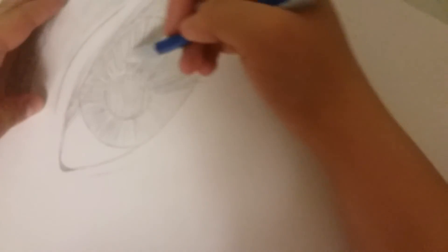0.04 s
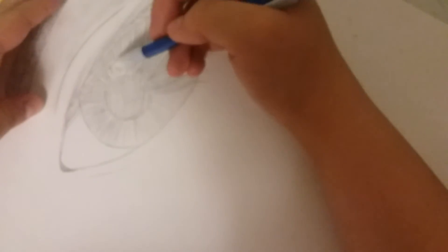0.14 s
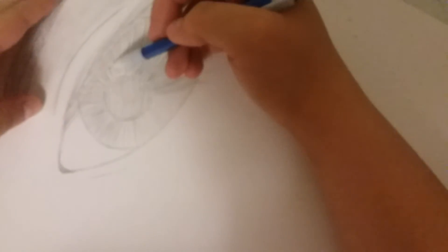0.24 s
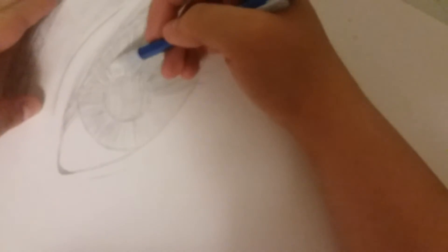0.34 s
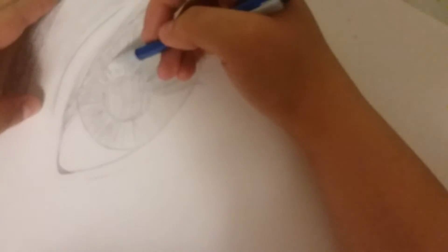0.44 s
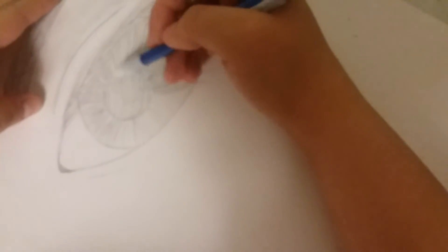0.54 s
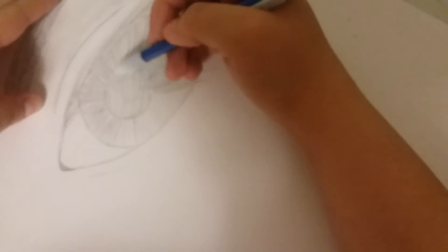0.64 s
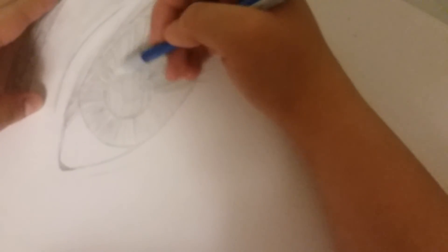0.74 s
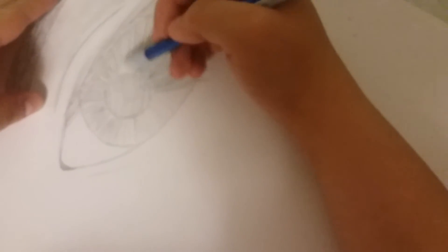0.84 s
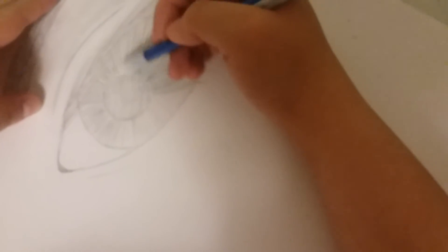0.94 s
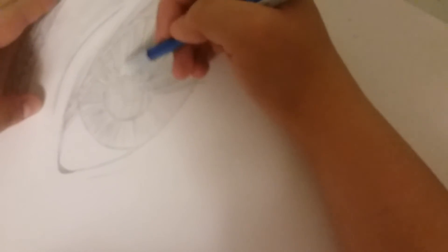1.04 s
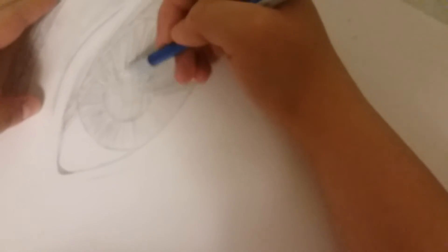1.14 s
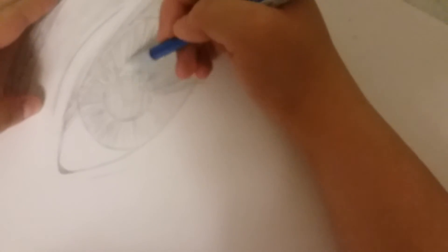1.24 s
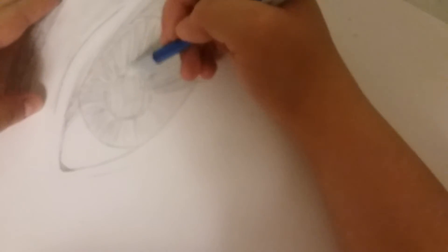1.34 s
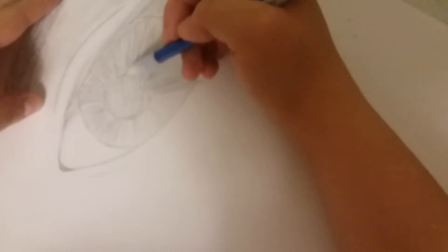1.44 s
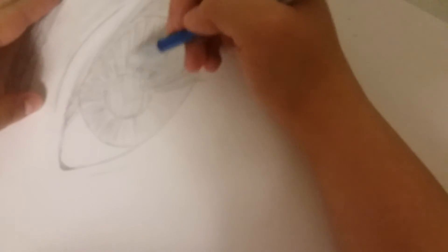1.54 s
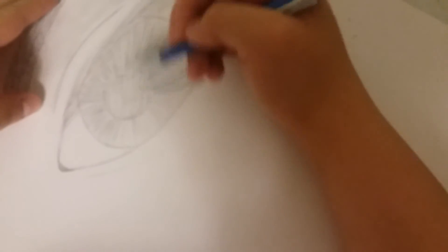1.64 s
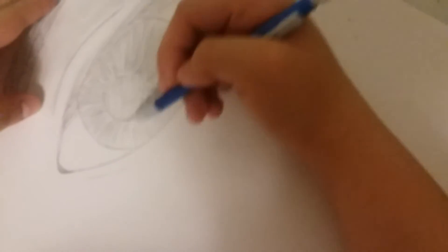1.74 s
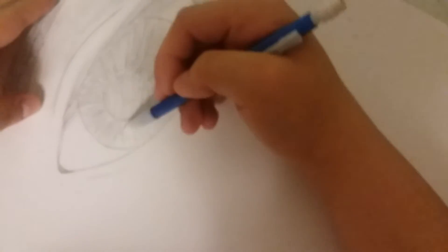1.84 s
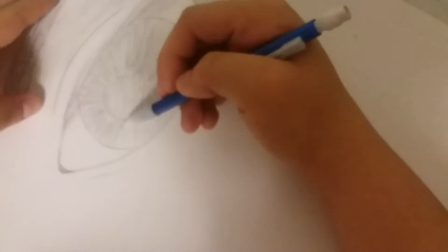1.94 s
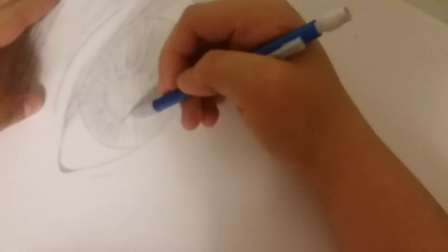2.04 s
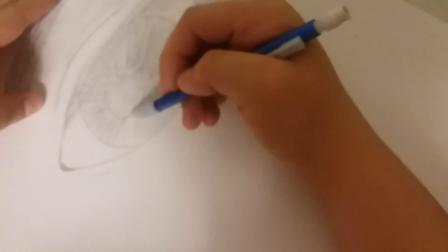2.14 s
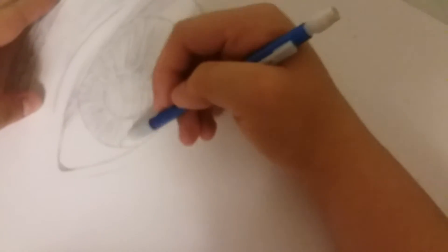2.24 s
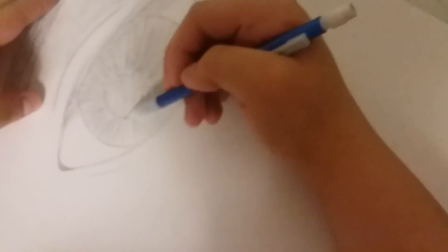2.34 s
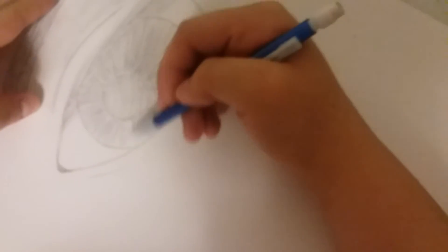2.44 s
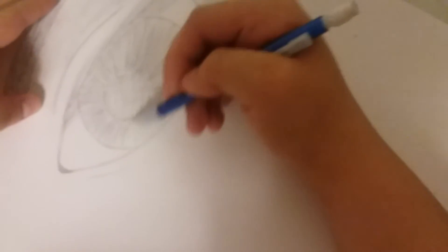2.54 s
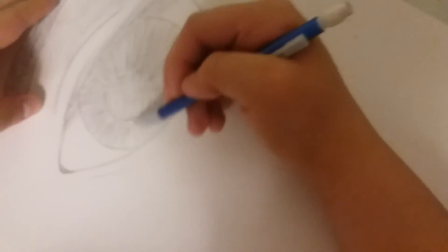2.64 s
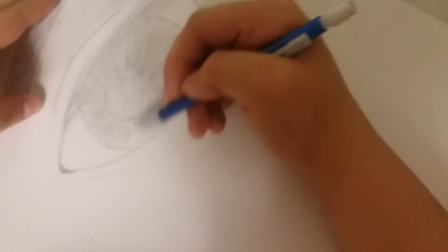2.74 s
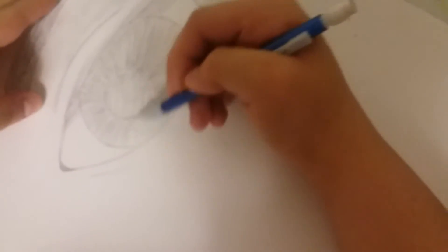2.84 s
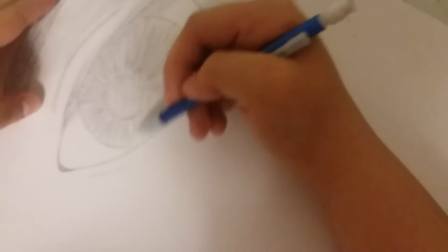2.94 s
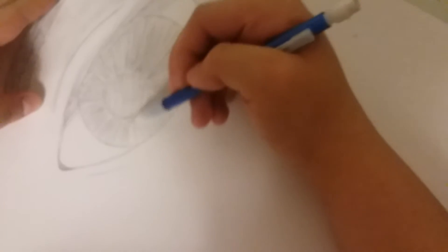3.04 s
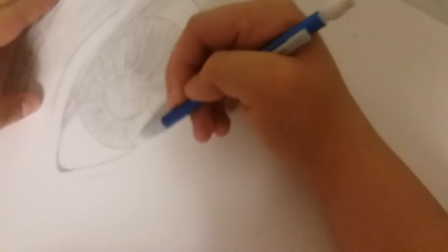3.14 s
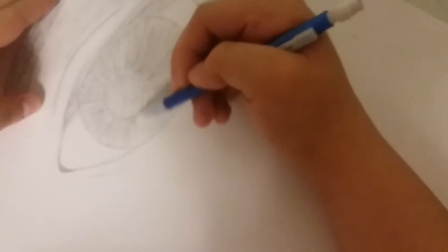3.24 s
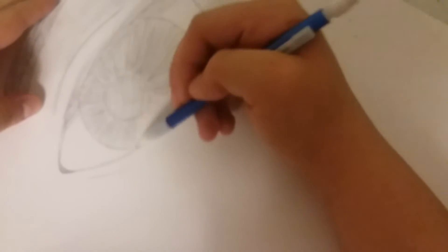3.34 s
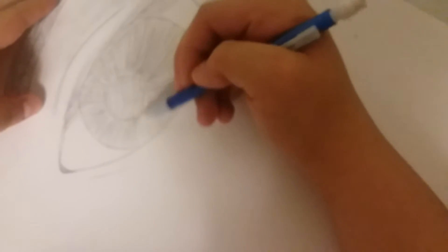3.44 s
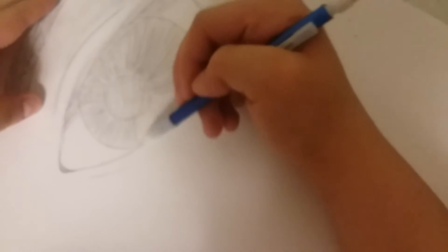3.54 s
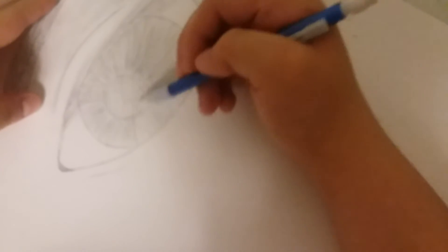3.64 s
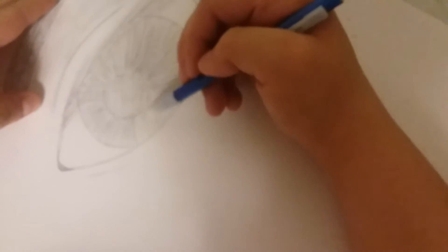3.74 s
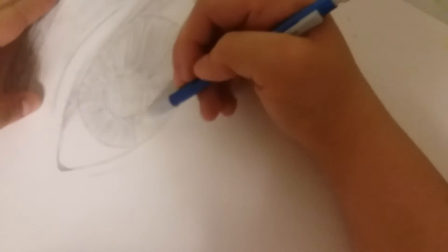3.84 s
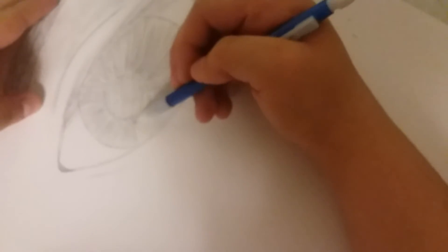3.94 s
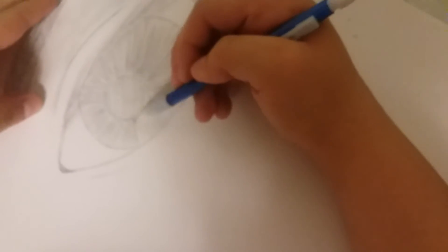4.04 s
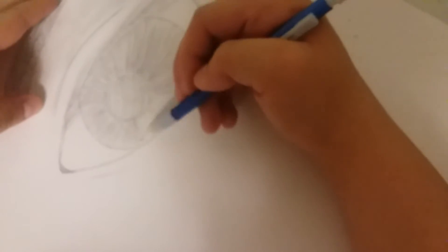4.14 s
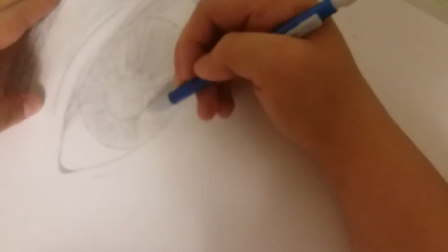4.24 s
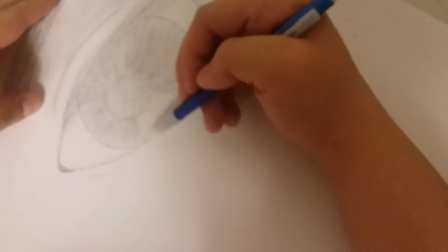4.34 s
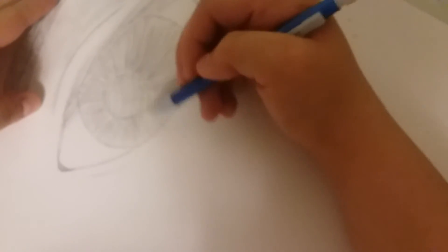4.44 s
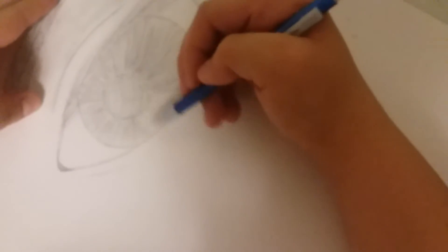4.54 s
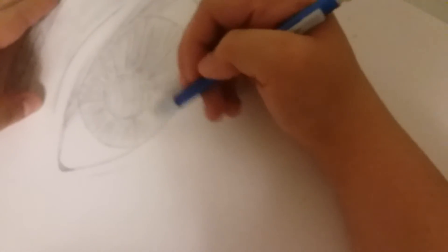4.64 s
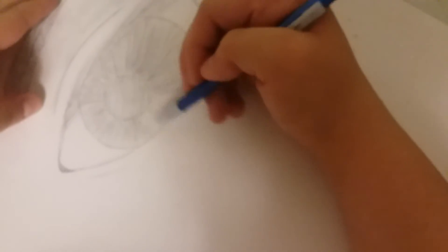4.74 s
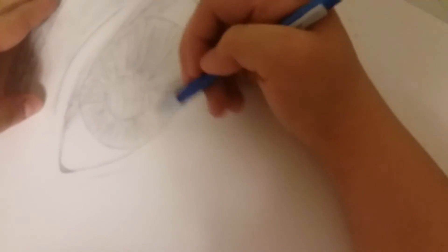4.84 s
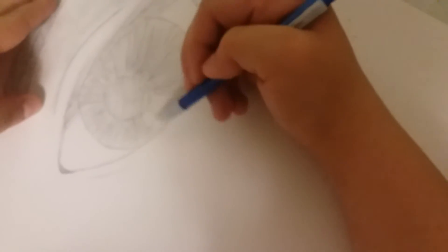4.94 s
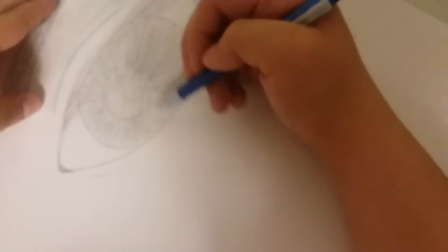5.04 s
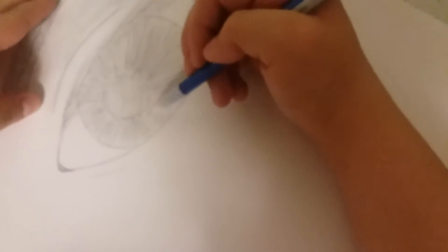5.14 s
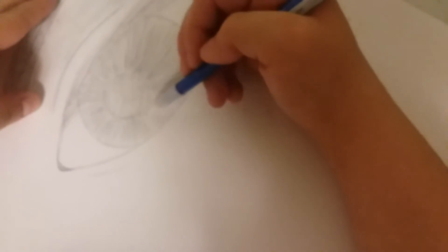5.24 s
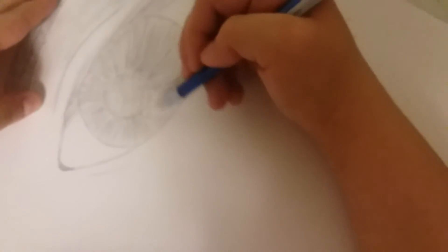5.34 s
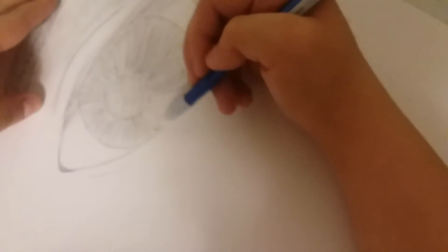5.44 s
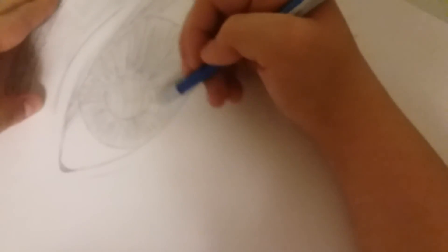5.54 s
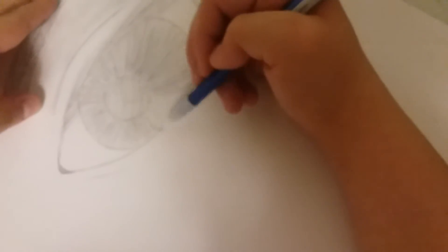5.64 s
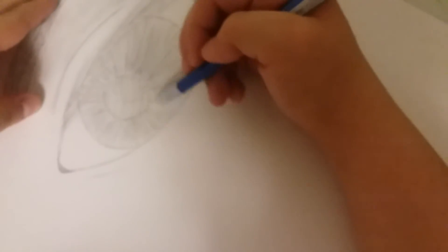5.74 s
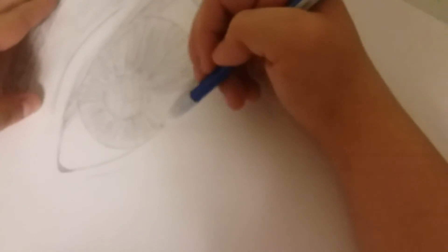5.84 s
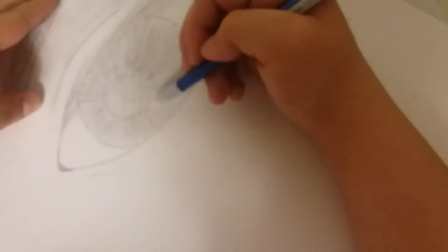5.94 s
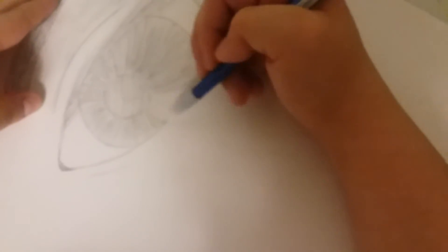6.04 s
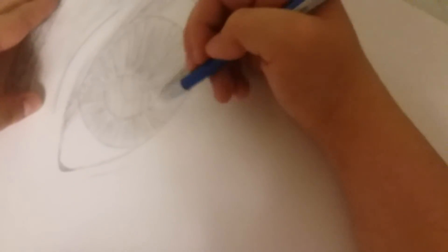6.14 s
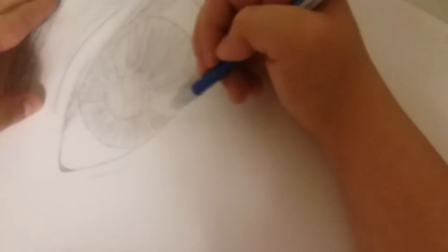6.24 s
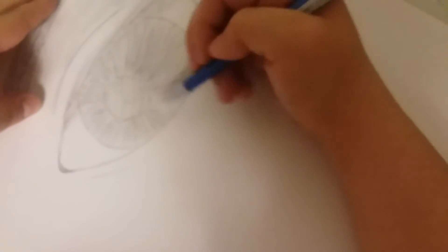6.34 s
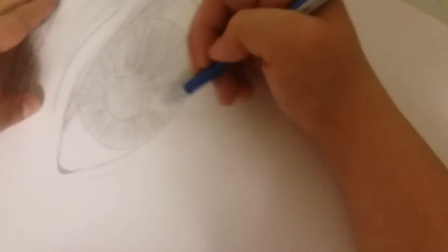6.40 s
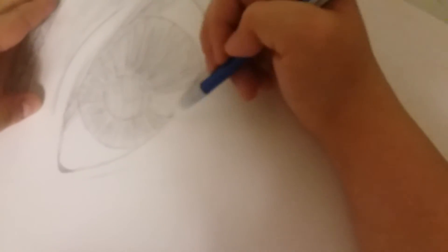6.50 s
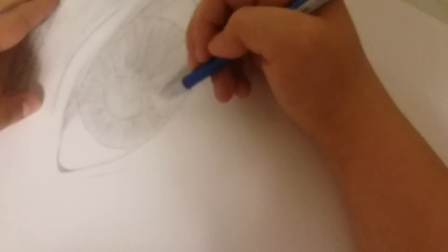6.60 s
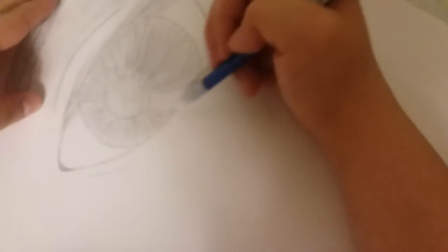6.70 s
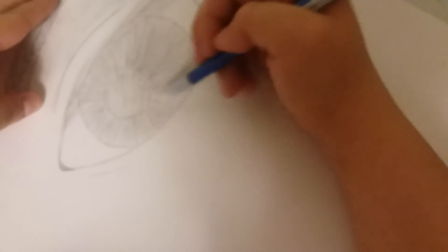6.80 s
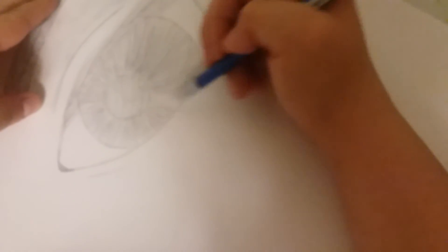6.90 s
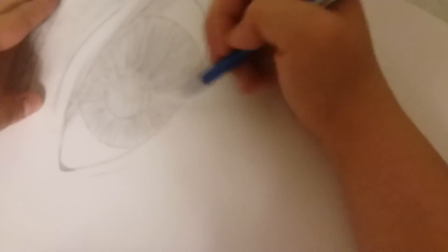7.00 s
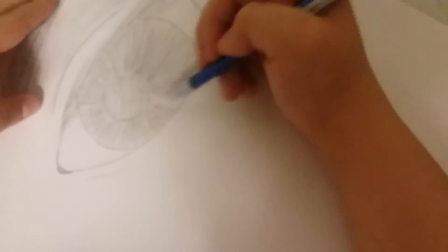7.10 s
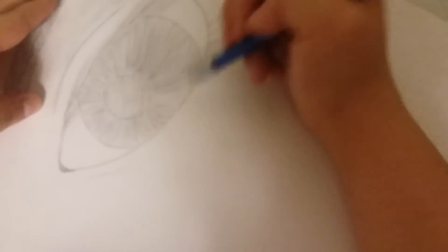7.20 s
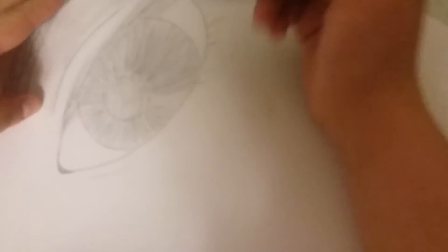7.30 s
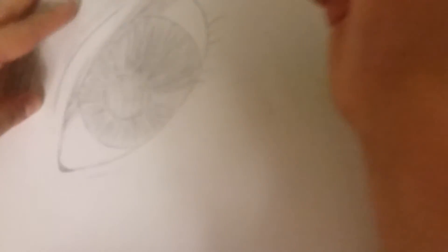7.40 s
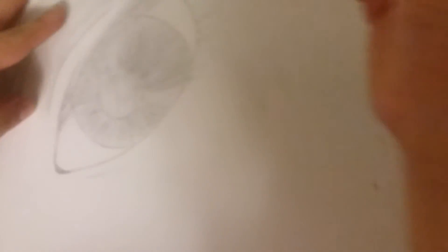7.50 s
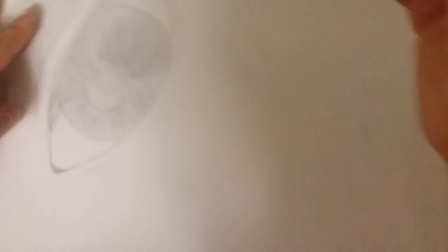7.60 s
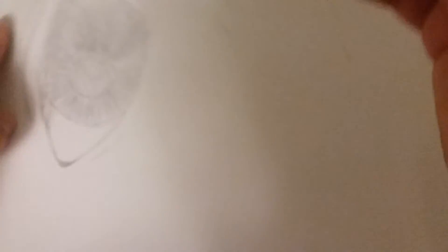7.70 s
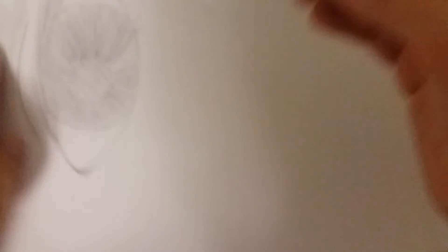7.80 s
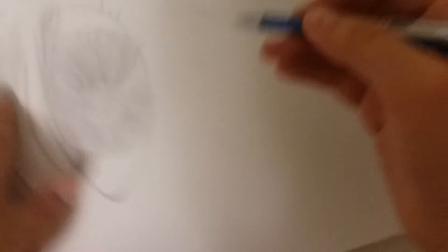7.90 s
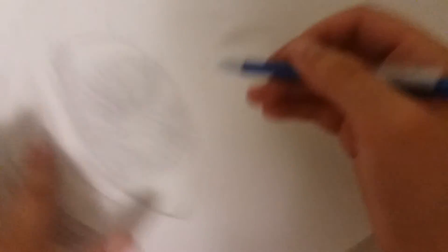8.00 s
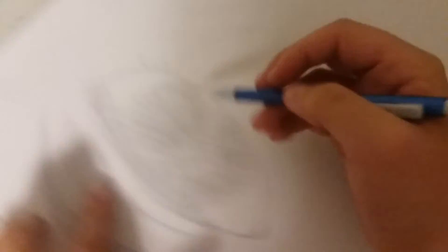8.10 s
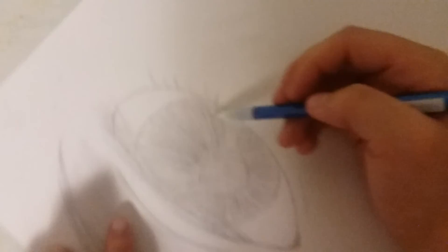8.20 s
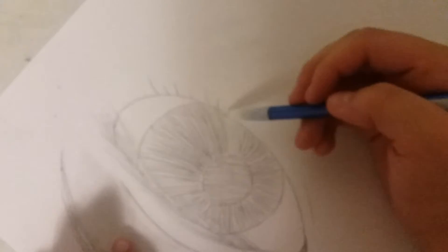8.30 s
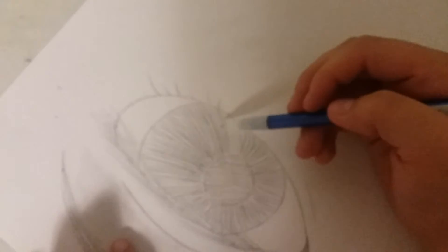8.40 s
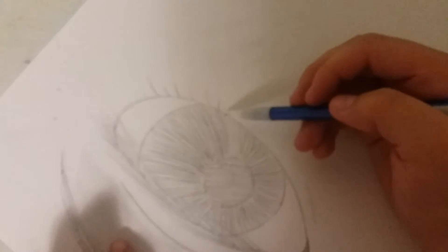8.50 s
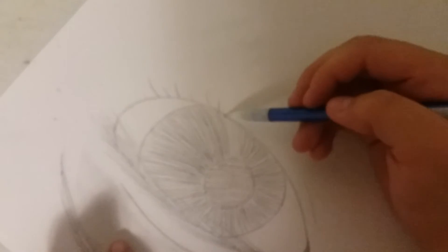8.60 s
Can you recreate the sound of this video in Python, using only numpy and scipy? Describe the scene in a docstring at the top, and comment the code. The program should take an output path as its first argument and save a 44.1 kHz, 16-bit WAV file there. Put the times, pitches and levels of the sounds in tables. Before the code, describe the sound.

A mechanical pencil shades on paper at a table, heard close up in a quiet room. After a soft brush of the hand and a small plastic click, quick short strokes scratch and hiss, with light taps as the lead lands. The shading pauses briefly, once for a dull bump and another click. Near the end a hand thumps down loudly and slides the sheet round, its edge scraping and snapping crisply.

```python
"""A table in a quiet room, where a mechanical pencil shades a drawing in quick, short strokes.
The lead lands with a tap and rides over the paper's tooth, which hisses and makes the table top murmur.
The hand brushes the sheet, and the pencil's plastic parts click as the grip shifts.
Near the end the hand thumps down and slides the sheet round, its edge scraping and snapping."""
import sys
import numpy as np
from scipy import signal
from scipy.fft import rfft, irfft, next_fast_len
from scipy.io import wavfile

SR = 44100
rng = np.random.default_rng(int(sys.argv[2]) if len(sys.argv) > 2 else 0)


def file_out(sig):
    """Save sig as 16-bit WAV at sys.argv[1]."""
    # one column per channel
    cols = np.atleast_2d(sig).T
    # limit, then scale
    lim = np.clip(cols, -1, 1)
    pcm = np.round(lim * 32767).astype(np.int16)
    wavfile.write(sys.argv[1], SR, pcm)


N = 381906
TIME = np.arange(N) / SR
TOP_HZ, HIT_SAMPLES = 15830, 22050

# broad hiss of blunt lead on the paper's tooth: freq_hz, level_db
BLUNT_HISS = [(800, -10.5), (2200, 1), (3600, -6.5), (4500, 0), (6000, -4.5), (8500, -1), (10000, -7),
              (13000, 0.5), (16000, 2.5)]


def pencil():
    """Each stroke speeds up and slows down; the paper's tooth shakes the lead and the table under it."""
    # long pulls and quick flicks back: middle_s, length_s, level_db
    strokes = [(0.615, 0.13, -53), (0.829, 0.14, -56.5), (1.034, 0.13, -52), (1.112, 0.14, -59),
               (1.207, 0.12, -53), (1.28, 0.15, -63), (1.367, 0.11, -57.5), (1.437, 0.098, -56.5),
               (1.507, 0.1, -58), (2.27, 0.16, -51), (2.428, 0.15, -67.5), (2.504, 0.13, -47.5),
               (2.733, 0.16, -49.5), (2.859, 0.064, -62), (2.94, 0.15, -49), (3.074, 0.068, -65),
               (3.16, 0.16, -48), (3.293, 0.036, -65.5), (3.367, 0.16, -49), (3.564, 0.14, -47),
               (4.173, 0.15, -51), (4.249, 0.065, -60.5), (4.382, 0.18, -51), (4.61, 0.16, -49),
               (4.692, 0.081, -59), (4.813, 0.16, -53.5), (4.998, 0.14, -50.5), (5.067, .113, -63),
               (5.451, 0.16, -54.5), (5.527, 0.075, -58), (5.661, 0.19, -55.5), (5.871, 0.16, -57),
               (6.076, 0.17, -55), (6.155, 0.073, -64), (6.299, 0.16, -59), (6.519, 0.2, -60),
               (6.601, 0.055, -57.5), (6.745, 0.21, -60.5), (6.83, 0.061, -64), (6.979, 0.2, -59.5),
               (7.204, 0.19, -62)]
    # the pencil sits mostly to the right: freq_hz, right_minus_left_db
    balance = [(100, 2), (500, -1), (950, 2.5), (1600, -0.5), (2900, 6), (4200, 0), (9000, 2), (12200, 2),
               (14500, 7), (16000, 4)]
    force = swells(strokes, sharpness=3.03)
    pace = swells([(middle, length, 0) for middle, length, _ in strokes])
    return pan(murmur(force, pace) + hiss(force) + squeak() + landings(), balance)


def murmur(force, pace, gain_db=0.23, brighten=0.085, firm_weight=0.33, thin_hz=560):
    """The dragged lead shakes the table; a faster lead meets more fibres, so the pitch rises."""
    centre_hz, _, weight = grip(TIME)
    drag = force * friction(catches_per_s=650, rough_db=2.5)
    centre_hz = centre_hz * (1 + brighten * (pace - 0.5))
    # the colour glides by crossfading between six steady ones
    steps_hz = np.geomspace(500, 1300, 6)
    fades = [np.interp(centre_hz, steps_hz, share) for share in np.eye(6)]
    body = undb(gain_db) * sum(fade * lead_on_table(drag, hz) for hz, fade in zip(steps_hz, fades))
    # a light touch hardly stirs the table's lower modes
    lightness = np.clip(1 - weight / firm_weight, 0, 1)
    return body - lightness * through(body, lambda f: 1 / (1 + (f / thin_hz) ** 10))


def hiss(force, gain_db=1):
    """The paper's tooth scratches the lead: a sharp point sizzles on top, a blunt one hisses broadly."""
    # the pencil leans onto the blunt side of its lead: time_s, blunt_share (0-1)
    lean = [(.6, 0.6), (1.5, 0.74), (2.3, 0.2), (3.6, 0.03), (5.6, 0.03), (6.3, 0.5), (6.7, 1), (7.1, 0.94)]
    # sizzle of the sharp point: freq_hz, level_db
    sharp_hiss = [(800, -30), (2200, -14.5), (3300, -16.5), (4400, -16), (5500, -15), (6700, -12),
                  (9800, -18.5), (11500, -11), (13000, -4.5), (15000, -0.5), (16000, -3.5)]
    _, hiss_db, _ = grip(TIME)
    blunt = np.interp(TIME, *np.transpose(lean))
    scratch = undb(gain_db + hiss_db) * force * friction(catches_per_s=1900, rough_db=2)
    return np.sqrt(1 - blunt) * colour(scratch, sharp_hiss) + np.sqrt(blunt) * colour(scratch, BLUNT_HISS)


def squeak(pitch_hz=965, width_hz=35):
    """The lead squeaks faintly in one narrow band."""
    # the squeak's swell: middle_s, length_s, level_db
    squeaks = [(6.54, 0.17, -59)]
    ring = through(noise_pair(), lambda f: resonance(f, pitch_hz, width_hz) ** 2)
    return swells(squeaks) * ring / np.std(ring)


def landings(dulling=0.14, tick_db=-14, thud_db=-3):
    """The lead taps the table and ticks on the paper; with more weight the tap is duller and thuds."""
    # the lead lands or catches: start_s, level_db
    contacts = [(.593, -54), (0.761, -63), (0.968, -66), (1.186, -53.5), (2.691, -63), (2.949, -47.5),
                (3.321, -75), (3.503, -56.5), (4.349, -59), (4.538, -56.5), (4.733, -61), (4.932, -60),
                (5.402, -61.5), (5.579, -62), (5.816, -64), (6.008, -54.5), (6.231, -61), (6.453, -58.5),
                (6.686, -58.5), (6.919, -53), (7.149, -51)]
    start_s, db = np.transpose(contacts)
    centre_hz, _, weight = grip(start_s)
    taps = play(zip(start_s, db, centre_hz * (1 - dulling * weight)), tap)
    ticks = play(zip(start_s, db + tick_db), lambda: colour(burst(t60_s=0.024), BLUNT_HISS))
    thuds = play(zip(start_s, db + thud_db + 40 * np.log10(weight)), thud)
    return taps + ticks + thuds


def tap(centre_hz, t60_s=0.11, settle_s=0.022, sag=1.12):
    """The lead strikes the table; its ring sinks in pitch as it settles into the paper."""
    strike = burst(t60_s)
    fresh = np.exp(-np.arange(HIT_SAMPLES) / SR / settle_s)
    attack = lead_on_table(strike * fresh, centre_hz * sag)
    return attack + lead_on_table(strike * (1 - fresh), centre_hz / sag)


def thud(t60_s=0.26, cutoff_hz=150):
    """The hand's weight sets the table's lowest modes shuddering."""
    return through(burst(t60_s), lambda f: table_top(f, flat_db=-13) / (1 + 1j * f / cutoff_hz) ** 4)


def grip(times_s):
    """The grip changes slowly as the shading moves round: murmur centre, hiss level and hand weight."""
    # the hold on the pencil: time_s, murmur_centre_hz, hiss_over_murmur_db, hand_weight (0-1)
    holds = [(.6, 820, -12.5, 0.16), (1.5, 810, -7.5, 0.09), (2.3, 836, -8.5, 0.28), (3.4, 925, -7, 0.26),
             (4.5, 820, -6.5, 0.5), (5.5, 783, -2, 0.88), (6.2, 750, -3.5, 1), (7.1, 677, -3, .95)]
    knots_s, *columns = np.transpose(holds)
    return [np.interp(times_s, knots_s, column) for column in columns]


def lead_on_table(force, centre_hz, usual_hz=850):
    """Force at the lead, shifted in colour by centre_hz / usual_hz, rings through the table."""
    # drag of the lead on paper: freq_hz, level_db
    drag = [(50, -30.5), (160, -18), (290, -28.5), (400, -6.5), (520, -6.5), (750, -0.5), (950, -2.5),
            (1250, -6), (1500, -15.5), (2000, -11.5), (3200, -35), (6000, -30), (12000, -41)]
    shifted = [(hz * centre_hz / usual_hz, db) for hz, db in drag]
    return colour(force, shifted, on_table=True)


def table_top(f, flat_db=-9):
    """The table's modes ring over an even response."""
    # modes of the top: pitch_hz, width_hz, level_db
    modes = [(82, 31, -2.5), (145, 13, 0.5), (166.4, 18.4, 8), (288.6, 24, 0.5), (416.5, 20, 2),
             (504.4, 31, 1.5), (646.7, 26, -0.5), (769, 25.4, 0), (927, 64, 3.5), (1036, 95, -7)]
    return undb(flat_db) + sum(undb(db) * resonance(f, hz, width) for hz, width, db in modes)


def handling():
    """The hand shifts its grip, drops on the table and turns the sheet."""
    # the hand meets the table: start_s, level_db, contact_cutoff_hz
    thumps = [(.12, -58, 500), (.168, -57, 120), (1.874, -33, 60), (1.931, -52, 60), (1.953, -56.5, 60),
              (7.489, -15, 500), (7.499, -21.5, 802), (8.07, -40, 400)]
    # hand and sheet sit slightly right: freq_hz, right_minus_left_db
    balance = [(100, 1.5), (500, 1.5), (2700, 1), (7000, 2), (11000, 0.5), (16000, 1)]
    hits = play(thumps, palm_thump) + pencil_clicks() + paper_snaps()
    return pan(hits + rubbing(*(brushing() + turning())), balance)


def palm_thump(contact_hz, t60_s=0.2, slap_hz=600, cushion_hz=3000):
    """Flesh pushes the table and the paper slaps under it; a softer contact loses the treble."""
    # body of the palm's blow: freq_hz, level_db
    palm = [(35, -32.5), (60, -8.5), (100, 2.5), (175, 2.5), (290, 4.5), (500, -9), (900, -11.5),
            (1100, -28.5), (1400, -16.5), (2500, -21.5), (6000, -49.5)]
    blow = through(burst(t60_s), lambda f: (1j * f / (slap_hz + 1j * f)) ** 2)
    blow[:, 0] += 1  # the push: one impulse at the head of the slap
    soft = lambda f: 1 / ((1 + 1j * f / contact_hz) * (1 + 1j * f / cushion_hz))
    return through(blow, lambda f: table_top(f) * minimum_phase(palm, f) * soft(f))


def pencil_clicks():
    """The pencil's plastic parts click in the fingers."""
    # clicks: start_s, level_db, ring_t60_s
    clicks = [(.2165, -42, 0.11), (.376, -63.5, 0.3), (1.787, -48.5, 0.17)]
    # ring of the plastic: freq_hz, level_db
    plastic = [(60, -19), (250, -8.5), (450, -6.5), (800, -1), (1300, -15), (1900, -12), (2800, -20),
               (4500, -21), (7000, -36), (15000, -56)]
    return play(clicks, lambda t60_s: colour(burst(t60_s), plastic))


def paper_snaps():
    """The paper snaps crisply on the right, under the lead or at its edge."""
    # snaps: start_s, level_db, pitch_hz
    snaps = [(.143, -77, 8000), (7.338, -68.5, 7530), (7.711, -35, 7800), (7.755, -37, 7500),
             (7.772, -39.5, 3480)]
    snap = lambda hz: through(burst(t60_s=0.039), lambda f: resonance(f, hz, 0.38 * hz) ** 2)
    return play(snaps, snap) * undb([[-3], [1.5]])


def rubbing(rub, rasp, rumble):
    """Paper in sliding contact: a broad rub, a rasp from its edge on the right, a rumble in the table."""
    # rub of the sheet's face: freq_hz, level_db
    face_tone = [(100, -24), (300, -0.5), (420, -4.5), (780, 3), (920, 6.5), (1080, 1.5), (2400, -2),
                 (4000, -0.5), (8200, 0), (10000, -4.5), (13000, 0.5), (16000, -2)]
    # rasp of its edge: freq_hz, level_db
    edge_tone = [(1000, -29), (2600, -33), (3400, -8), (5000, -5.5), (6000, -2), (7500, 1), (8600, -1.5),
                 (10000, -9.5), (15000, -22.5)]
    # rumble fed into the table: freq_hz, level_db
    low_tone = [(30, -25.5), (80, -1.5), (160, -3.5), (300, -6), (450, -7), (1000, -14.5), (3000, -18),
                (9000, -47.5)]
    face = colour(rub * friction(catches_per_s=460, rough_db=2), face_tone)
    edge = colour(rasp * friction(catches_per_s=710, rough_db=4), edge_tone) * undb([[-4], [2]])
    low = colour(rumble * friction(catches_per_s=120, rough_db=5), low_tone, on_table=True)
    return face + edge + low


def turning(rub_db=7, rasp_db=2, press_db=-43, ease_db_per_s=38):
    """Rub, rasp and rumble envelopes of the turning sheet; the hand lands hard, then eases off."""
    # the sheet's rub follows its speed: time_s, level_db
    slide = [(7.505, -80), (7.519, -55), (7.685, -45), (7.779, -43), (7.811, -46), (7.973, -48),
             (8.099, -42.5), (8.293, -57), (8.38, -75)]
    # its edge scrapes over the table: middle_s, length_s, level_db
    scrapes = [(7.71, 0.17, -39), (7.788, 0.11, -38), (8.03, .2, -47)]
    times_s, db = np.transpose(slide)
    moving = (TIME >= times_s[0]) & (TIME <= times_s[-1])
    rub = undb(rub_db + np.interp(TIME, times_s, db))
    rasp = undb(rasp_db) * swells(scrapes, sharpness=1.2)
    rumble = undb(press_db - ease_db_per_s * abs(TIME - times_s[0]))
    return moving * np.array([rub, rasp, rumble])


def brushing(rub_db=6, rasp_db=-5, rumble_db=4):
    """Rub, rasp and rumble envelopes of the hand as it shifts over the paper."""
    # sweeps of the hand: middle_s, length_s, rub_level_db, rumble_level_db
    sweeps = [(0.031, 0.26, -65, -58.5), (0.139, .14, -61.5, -52.5), (0.232, .16, -77, -57.5),
              (1.75, 0.4, -80.5, -85), (1.899, 0.21, -74.5, -57.5), (3.757, 0.24, -74, -79),
              (4.544, 0.34, -91, -67), (5.17, 0.26, -78, -73.5), (6.864, 1.8, -87, -78.5),
              (7.372, .2, -80.5, -75), (7.471, 0.13, -76, -51.5), (8.299, 0.27, -84.5, -62)]
    rub = swells(np.array(sweeps)[:, :3], sharpness=1.86)
    rumble = swells(np.array(sweeps)[:, [0, 1, 3]], sharpness=2.7)
    return np.array([undb(rub_db) * rub, undb(rasp_db) * rub, undb(rumble_db) * rumble])


def near_echoes(x, echo_db=-6, spread_s=0.0056, above_hz=1500, count=8):
    """Hand, arm and table top throw the treble back within milliseconds, differently to each side."""
    lags_s = rng.uniform(0.00033, spread_s, (count, 2, 1))
    def response(f):
        share = undb(echo_db) * f ** 2 / (f ** 2 + above_hz ** 2)
        echoes = sum(np.exp(-2j * np.pi * f * lag) for lag in lags_s) / np.sqrt(count)
        return (1 + share * echoes) / np.sqrt(1 + share ** 2)
    return through(x, response)


def room(x, send_db=-14, t60_s=0.34, gap_s=0.007):
    """A small furnished room answers with a short tail, strongest in the mids."""
    tone = [(300, 0), (700, -3.5), (1500, 8), (6000, 2), (14000, -2.5)]  # freq_hz, level_db
    tail = through(burst(t60_s), lambda f: minimum_phase(tone, f))
    tail = np.pad(tail, ((0, 0), (int(gap_s * SR), 0)))
    return x + undb(send_db) * signal.fftconvolve(x, tail, axes=1)[:, :N]


def room_tone(level_db=-70):
    """A low hum of air and a faint hiss, slightly to the right."""
    # the room's air: freq_hz, level_db
    air = [(15, -54.5), (25, -30), (59, -22.5), (75, -7), (96, -5.5), (140, -14), (178, -15.5),
           (240, -26.5), (289, -20.5), (445, -26.5), (945, -27), (2420, -33), (3170, -35.5), (15500, -37.5)]
    return pan(colour(noise_pair(), air) * undb(level_db), [(100, 1), (1000, 1.8)])


def friction(catches_per_s, rough_db):
    """Friction noise: fibres catch and let go at random, each with its own force."""
    catches_s = np.cumsum(rng.exponential(1 / catches_per_s, N // 4))
    force = undb(rough_db * np.interp(TIME, catches_s, rng.standard_normal(len(catches_s))))
    return noise_pair() * force / np.sqrt(np.mean(force ** 2))


def burst(t60_s):
    """Dying stereo noise of unit energy."""
    x = noise_pair(HIT_SAMPLES) * np.exp(-np.log(1000) * np.arange(HIT_SAMPLES) / SR / t60_s)
    return x / np.sqrt(np.sum(x ** 2) / 2)


def noise_pair(size=N, lag_s=0.00009):
    """Stereo white noise: narrow in the bass, wide on top, reaching the left a little later."""
    # likeness of left and right: freq_hz, correlation (0-1)
    likeness = [(200, 0.76), (550, 0.77), (950, 0.84), (1400, 0.46), (3000, 0.37), (9000, 0.069),
                (14000, 0.15)]
    right, other = rng.standard_normal((2, size))
    shared = through(right, lambda f: curve(likeness, f) * np.exp(-2j * np.pi * f * lag_s))
    apart = through(other, lambda f: np.sqrt(1 - curve(likeness, f) ** 2))
    return np.array([shared + apart, right])


def swells(rows, sharpness=6.2):
    """Movements (middle_s, length_s, level_db) that speed up and slow down, as one gain curve."""
    gain = np.zeros(N)
    for middle, length, db in rows:
        span = slice(max(int((middle - length / 2) * SR), 0), int((middle + length / 2) * SR))
        gain[span] += undb(db) * abs(np.cos(np.pi * (TIME[span] - middle) / length)) ** sharpness
    return gain


def play(events, voice):
    """Trigger a voice for each row (start_s, level_db, any settings), levelled on its first 20 ms."""
    track = np.zeros((2, N + HIT_SAMPLES))
    for start_s, db, *settings in events:
        hit, start = voice(*settings), int(start_s * SR)
        attack_rms = np.sqrt(np.mean(hit[:, :SR // 50] ** 2))
        track[:, start:start + HIT_SAMPLES] += hit * undb(db) / attack_rms
    return track[:, :N]


def colour(x, spectrum, on_table=False):
    """Give white noise a spectrum, optionally ringing the table, at unchanged power."""
    def response(f):
        shape = minimum_phase(spectrum, f) * (table_top(f) if on_table else 1) * (f < TOP_HZ)
        return shape / np.sqrt(np.mean(abs(shape) ** 2))
    return through(x, response)


def pan(x, balance):
    """Lean a stereo pair by rows of (freq_hz, right_minus_left_db)."""
    return through(x, lambda f: undb(np.outer([-0.5, 0.5], curve(balance, f))))


def resonance(f, hz, width_hz):
    """Band-pass with gain 1 at its centre."""
    return 1j * f * width_hz / (hz ** 2 - f ** 2 + 1j * f * width_hz)


def minimum_phase(spectrum, f):
    """A response with this spectrum that rings only after the hit."""
    cepstrum = irfft(np.log(undb(curve(spectrum, f))))
    half = len(cepstrum) // 2
    cepstrum[1:half] *= 2
    cepstrum[half + 1:] = 0
    return np.exp(rfft(cepstrum))


def through(x, response):
    """Filter by a response given as a function of frequency."""
    size = 2 * next_fast_len(x.shape[-1] * 2 // 3)
    f = np.linspace(0, SR / 2, size // 2 + 1)
    return irfft(rfft(x, size) * response(f), size)[..., :x.shape[-1]]


def curve(points, f):
    """Join rows of (freq_hz, value) on a log-frequency axis."""
    hz, value = np.transpose(points)
    return np.interp(np.log(f + 1), np.log(hz), value)


def undb(db):
    """Decibels to gain."""
    return 10 ** (np.asarray(db) / 20)


def scene():
    """Pencil and hand in the room, over a bed of room tone."""
    return room_tone() + room(near_echoes(pencil() + handling()))


def record(dry):
    """A steep low-pass cuts the very top."""
    return signal.sosfiltfilt(signal.ellip(10, 0.1, 50, TOP_HZ, fs=SR, output="sos"), dry)


dry = scene()
out = record(dry)
file_out(out)
```